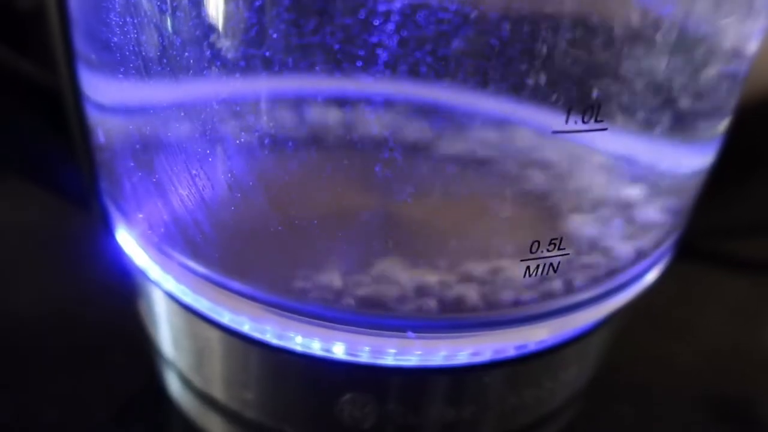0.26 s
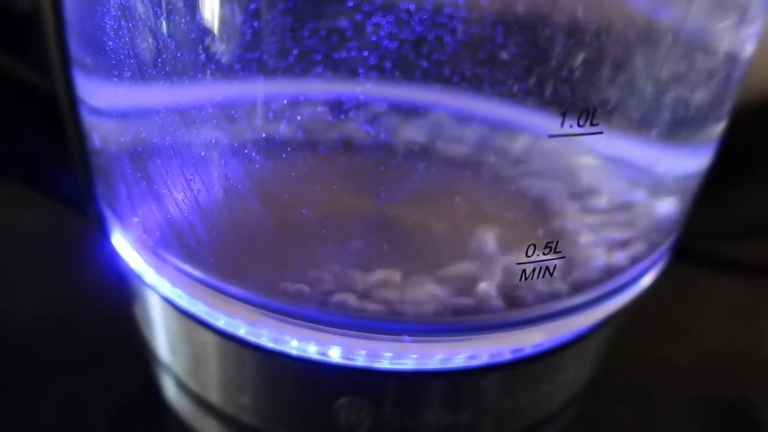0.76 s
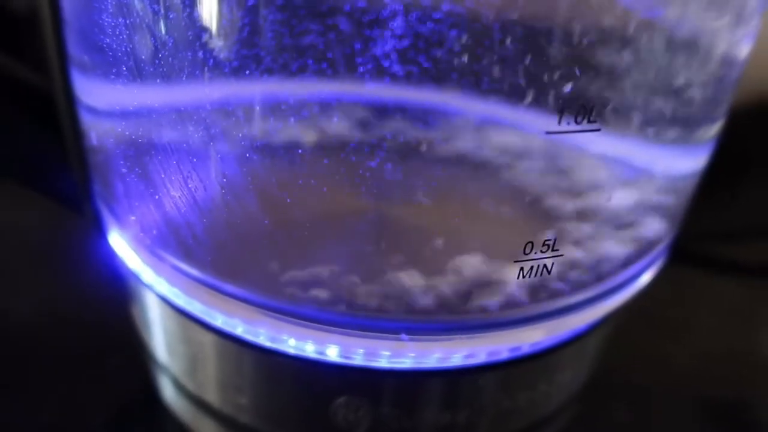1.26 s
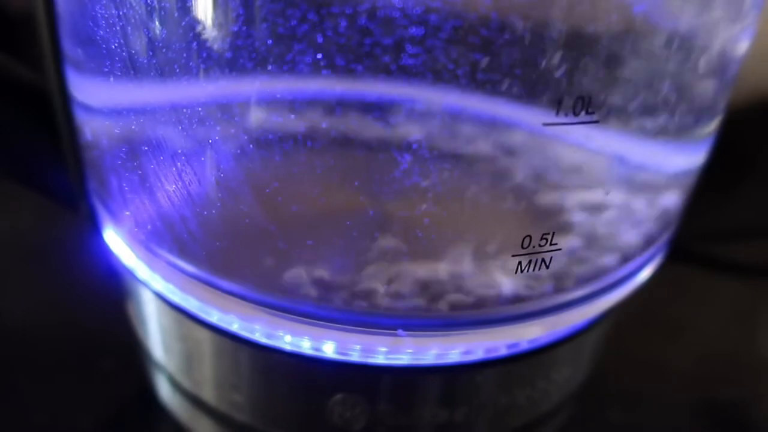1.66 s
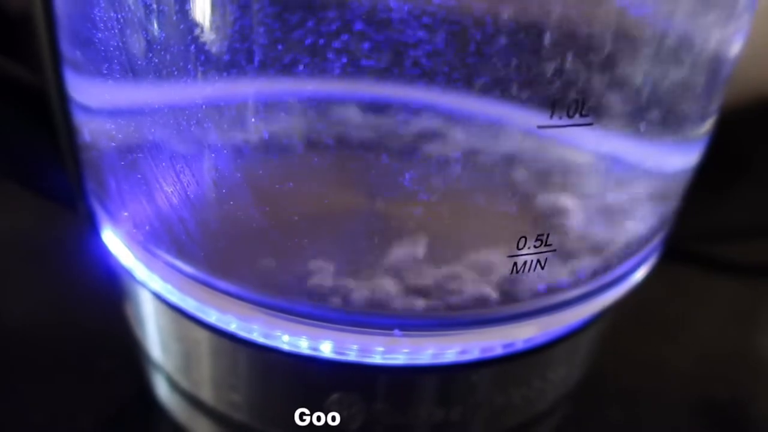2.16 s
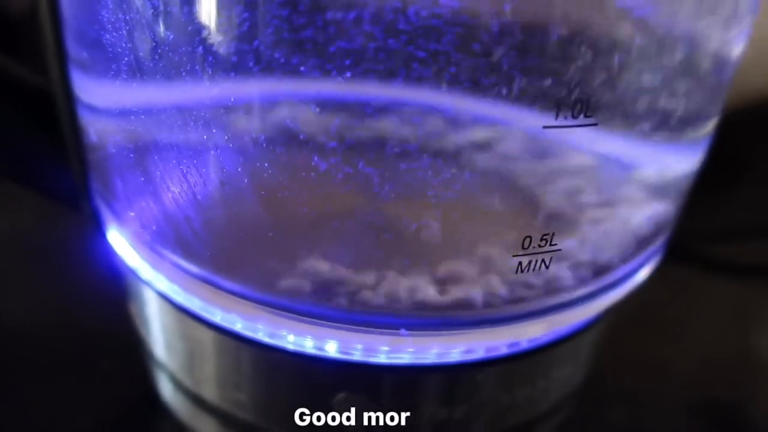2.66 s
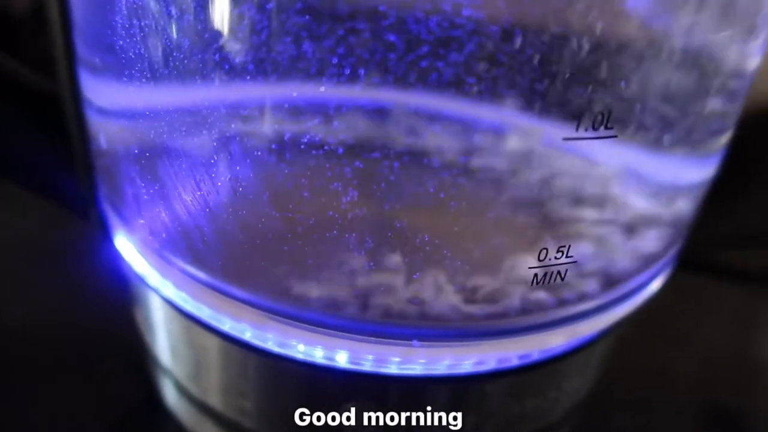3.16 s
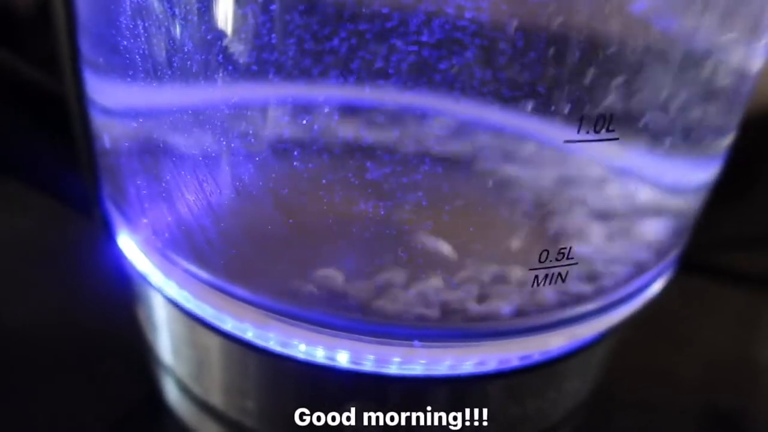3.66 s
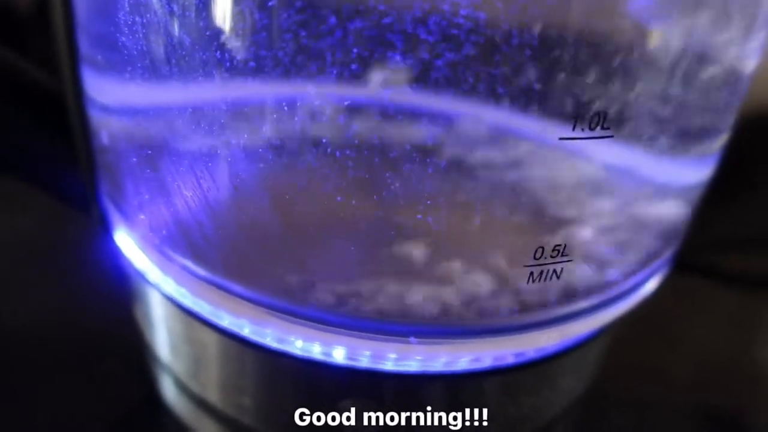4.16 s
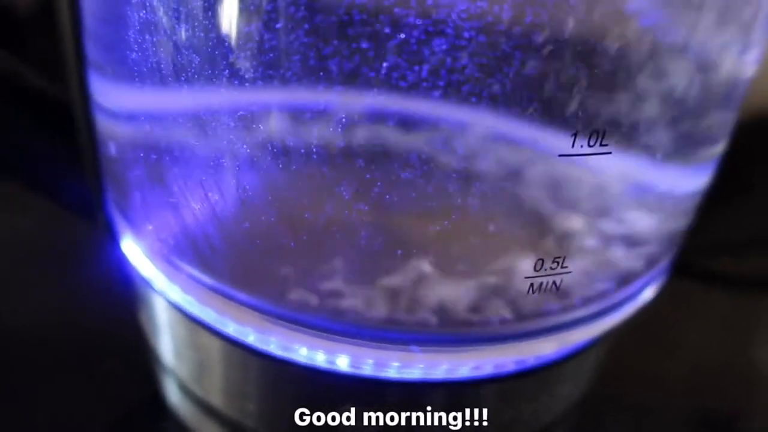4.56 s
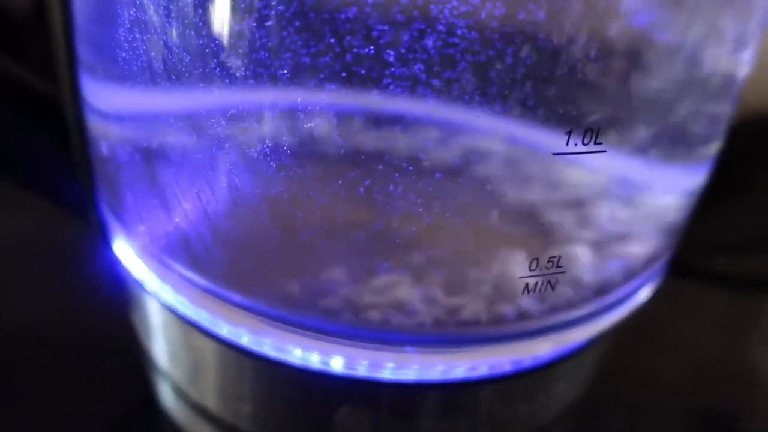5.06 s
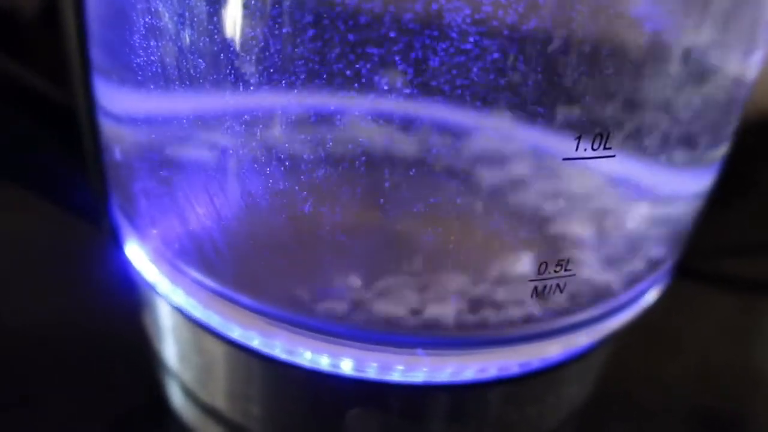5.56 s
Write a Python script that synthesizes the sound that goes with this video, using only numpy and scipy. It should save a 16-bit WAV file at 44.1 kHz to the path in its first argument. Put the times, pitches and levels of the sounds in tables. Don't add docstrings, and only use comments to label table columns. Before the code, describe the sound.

A glass kettle on a kitchen counter heats its water, heard very close in stereo. A deep, steady rumble runs throughout, pulsing irregularly as low booms swell and fade. Dull hollow knocks and small plate ticks from collapsing bubbles come several times a second, beneath a thin, grainy hiss. The bass sits in the centre while the hiss spreads wide. Nothing else happens.

```python
import sys
import numpy as np
from scipy import signal
from scipy.fft import rfft, irfft, next_fast_len
from scipy.io import wavfile
from scipy.ndimage import uniform_filter1d, map_coordinates

SR = 44100
rng = np.random.default_rng(int(sys.argv[2]) if len(sys.argv) > 2 else 0)


def ratio_of_db(decibels):
    return 10 ** (np.asarray(decibels, float) / 20)


def unload_wav(signal):
    wavfile.write(
        sys.argv[1],
        SR,
        np.round(np.clip(np.atleast_2d(signal).T, -1, 1) * 32767).astype(np.int16),
    )


N = 256220

# centre_hz, width_hz, lift_db
BASE_MODES = [(46.1, 8.5, 12), (79, 8.8, 3), (143.5, 24, 3), (323.8, 7.7, 5), (395.5, 35, 2.5),
              (435.4, 13, 6), (503.5, 27, 5)]
# centre_hz, width_hz, lift_db
PLATE_MODES = [(600, 44, 10), (648, 70, 8), (766, 44, 5.5), (856, 78, 9), (877, 24, 8), (962, 45, 7),
               (1020, 270, 4.5), (1277, 140, 6.5), (1550, 94, 7.5), (1638, 106, 6), (1800, 130, 4),
               (2100, 124, 5), (2406, 80, 3.5), (2610, 50, 6), (2690, 90, 2.5), (2900, 330, 3.5),
               (3085, 150, 4.5), (3200, 110, 3), (3287, 60, 7), (3400, 110, 5.5)]
# centre_hz, width_hz, lift_db
GLASS_MODES = [(3885, 90, 3), (4030, 80, 5), (4170, 126, 11), (4285, 81, 9.5), (4570, 100, 4),
               (5660, 59, 9), (6140, 340, 8.5), (6480, 160, 5.5), (7396, 280, 13.5), (7730, 130, 6.5),
               (9560, 230, 7), (10000, 140, 2.5), (12500, 440, 7)]

# frequency_hz, level_db (per Hz)
BASE_COLOUR = [(12, -57), (28, -19.5), (65, -14), (90, -1), (107, -3.5), (125, -1), (190, -6), (300, -4),
               (450, -12), (560, -16.5), (640, -22), (800, -69.5)]
# frequency_hz, level_db (per Hz)
WATER_COLOUR = [(150, -61), (215, -7.5), (240, -2), (256, 3), (278, -2), (305, -12), (420, -69.5)]
# frequency_hz, level_db (per Hz)
PLATE_COLOUR = [(400, -46), (540, -5.5), (640, -1.5), (1000, -4.5), (1420, -10), (2000, -11), (2800, -11.5),
                (3500, -27), (3800, -53.5), (4500, -67.5)]
# frequency_hz, level_db (per Hz)
GLASS_COLOUR = [(2800, -41), (3400, -5), (3700, 0), (4600, -5), (5400, -8), (7050, -8), (8100, -10),
                (9200, -12), (10500, -18), (11500, -19), (12700, -24), (13300, -29), (15200, -33),
                (16000, -90)]
# frequency_hz, level_db
PORT_DIFFERENCE = [(100, -71), (150, -50), (200, -44), (270, -39), (370, -21), (900, -27), (1300, -23),
                   (2200, -26), (2900, -19.5), (3300, -17), (3700, -2.5), (4200, -2), (5200, -2),
                   (7400, -1.5), (9000, 2), (14000, 1)]

# start_s, peak_db, pitch_hz
PLATE_FLECKS = [(0.068, -19, 840), (0.214, -24, 880), (0.481, -23, 872), (0.556, -32, 846),
                (0.753, -26, 880), (0.838, -26, 845), (0.896, -25, 854), (1.038, -35, 990),
                (1.113, -27, 880), (1.312, -26, 978), (1.346, -31, 870), (1.633, -28, 872),
                (1.717, -30, 886), (1.843, -31, 964), (1.936, -25, 880), (1.992, -29, 888),
                (2.107, -37, 880), (2.178, -27, 840), (2.237, -33, 840), (2.299, -34, 800),
                (2.342, -36, 872), (2.481, -35, 964), (2.524, -27, 850), (2.76, -31, 912),
                (3.247, -30, 880), (3.301, -24, 875), (3.339, -27, 893), (3.398, -36, 894),
                (3.523, -25.5, 867), (3.91, -33, 855), (4.105, -26, 840), (4.191, -29, 885),
                (4.269, -29, 854), (4.453, -32, 917), (4.604, -30, 891), (4.792, -32, 850),
                (4.886, -24, 872), (4.939, -37, 880), (5.223, -28, 860), (5.302, -29, 860),
                (5.403, -35, 876), (5.515, -28, 857), (5.615, -26, 868), (5.704, -28, 860),
                (5.766, -42, 900)]
# start_s, peak_db, pitch_hz
PLATE_KNOCKS = [(0.023, -24, 454), (0.271, -25, 358), (0.305, -17, 340), (0.396, -22, 380),
                (0.513, -23, 386), (0.551, -18, 342), (0.628, -16.5, 340), (0.767, -16, 440),
                (0.97, -25, 366), (1.047, -17, 350), (1.149, -21, 366), (1.206, -21, 388),
                (1.319, -22, 452), (1.379, -29, 354), (1.438, -19, 432), (1.498, -18, 398),
                (1.598, -23, 400), (1.644, -19, 436), (1.88, -30, 375), (2.0, -19, 377), (2.044, -18, 386),
                (2.111, -27, 410), (2.25, -18, 415), (2.441, -19, 358), (2.496, -21, 354),
                (2.601, -27, 431), (2.931, -27, 444), (3.088, -18, 347), (3.186, -17, 345),
                (3.445, -17.5, 378), (3.586, -19, 434), (3.701, -24, 348), (3.857, -14, 345),
                (3.915, -16, 346), (4.023, -21, 367), (4.064, -30, 439), (4.095, -27, 536),
                (4.128, -21, 383), (4.265, -18, 398), (4.606, -22.5, 387), (4.721, -21, 350),
                (4.813, -26, 396), (5.4, -24, 342), (5.496, -29, 490), (5.59, -27, 538)]
# start_s, length_s, level_db, pitch_hz
COLUMN_SURGES = [(0.006, 0.034, -26, 247), (0.285, 0.027, -27, 254.2), (0.402, 0.054, -24, 264),
                 (0.465, 0.032, -27, 262), (0.828, 0.026, -26, 269), (0.894, 0.036, -29.5, 272),
                 (0.984, 0.035, -29.5, 257), (1.143, 0.02, -21.5, 253), (1.294, 0.023, -25.5, 250),
                 (1.381, 0.034, -29, 261.6), (1.563, 0.042, -27, 259.7), (1.609, 0.03, -29.5, 230),
                 (1.681, 0.028, -24, 250), (2.101, 0.042, -28.5, 257.1), (2.236, 0.031, -23.5, 268.6),
                 (2.396, 0.027, -27.5, 271), (2.701, 0.045, -26, 258.2), (2.786, 0.031, -23, 253),
                 (2.884, 0.032, -27, 245), (3.194, 0.026, -30, 259), (3.433, 0.044, -25, 260.4),
                 (3.573, 0.026, -28, 258), (3.683, 0.018, -26, 271), (3.855, 0.054, -29, 239),
                 (3.94, 0.034, -26.5, 259.6), (4.048, 0.027, -26.5, 265.3), (4.249, 0.045, -25.5, 255),
                 (5.128, 0.044, -26.5, 263), (5.221, 0.03, -25.5, 264), (5.307, 0.031, -23.5, 256),
                 (5.458, 0.064, -27.5, 244.3), (5.713, 0.052, -27, 243), (5.774, 0.036, -27, 259)]
# start_s, length_s, level_db, pitch_hz
BASE_SURGES = [(0.141, 0.031, -27, 141.4), (0.177, 0.07, -29, 140), (0.271, 0.046, -24, 151),
               (0.419, 0.041, -29, 154.8), (0.462, 0.061, -27, 132), (0.624, 0.031, -37, 146.8),
               (0.728, 0.033, -36, 146.7), (0.784, 0.051, -29, 148), (1.047, 0.061, -32, 154),
               (1.309, 0.027, -29, 134), (1.368, 0.049, -25, 146.8), (1.448, 0.027, -24, 130),
               (1.598, 0.032, -29, 148), (1.728, 0.033, -36, 135), (1.763, 0.032, -29, 136),
               (1.829, 0.037, -24, 150), (1.925, 0.038, -25, 149.4), (2.011, 0.051, -31, 141),
               (2.139, 0.053, -29, 152), (2.4, 0.078, -27, 146), (2.663, 0.033, -30, 154.9),
               (2.755, 0.035, -30, 139), (3.065, 0.035, -27, 136.3), (3.252, 0.041, -24, 144.1),
               (3.342, 0.05, -31, 146), (3.472, 0.038, -29, 133.2), (3.518, 0.041, -28, 163),
               (3.677, 0.047, -32, 140), (3.833, 0.033, -27, 160.5), (3.881, 0.04, -25, 159),
               (3.929, 0.035, -32, 137), (4.002, 0.031, -30, 146), (4.114, 0.035, -28, 140.0),
               (4.15, 0.039, -30, 139), (4.282, 0.049, -30, 137), (4.415, 0.042, -27, 150),
               (4.831, 0.028, -36, 145), (4.992, 0.07, -29, 148), (5.078, 0.051, -30, 145),
               (5.176, 0.097, -23.5, 145), (5.347, 0.045, -24, 150.0), (5.565, 0.073, -26, 144)]
# start_s, length_s, level_db, pitch_hz
COUNTER_SURGES = [(0.042, 0.043, -25, 107), (0.089, 0.029, -34, 96.3), (0.164, 0.065, -21, 110),
                  (0.3, 0.22, -23.5, 103.7), (0.606, 0.17, -22.5, 107), (0.943, 0.097, -20, 111),
                  (1.056, 0.11, -23, 105), (1.266, 0.054, -23.5, 100), (1.604, 0.1, -22.5, 104),
                  (1.749, 0.033, -27, 119), (1.797, 0.072, -24.5, 112.4), (2.02, 0.049, -24, 109.2),
                  (2.083, 0.084, -24, 104.5), (2.17, 0.12, -24, 106), (2.334, 0.031, -26, 104),
                  (2.374, 0.19, -22.5, 104), (2.582, 0.063, -24, 103), (2.703, 0.08, -20.5, 106.5),
                  (2.826, 0.047, -25, 103), (2.873, 0.059, -24, 105.3), (2.957, 0.049, -26, 107.5),
                  (3.073, 0.16, -22, 107.4), (3.31, 0.065, -23, 102.3), (3.428, 0.19, -22, 107.3),
                  (3.627, 0.09, -21, 107), (3.749, 0.077, -21.5, 109), (3.95, 0.12, -19.5, 108),
                  (4.126, 0.14, -23, 106.8), (4.315, 0.17, -21, 103.4), (4.571, 0.075, -21.5, 111.8),
                  (4.678, 0.039, -25, 103.5), (4.719, 0.197, -24, 105), (4.919, 0.076, -23, 114),
                  (5.116, 0.039, -26, 102), (5.176, 0.11, -24, 104.6), (5.319, 0.083, -21, 107.7),
                  (5.415, 0.17, -21, 109.6), (5.653, 0.2, -22, 105.3)]

BASE_DB, COLUMN_DB, PLATE_DB, GLASS_DB = -26, -35, -34, -54
SOFTEN_DB_PER_S, SMALL_BUBBLE_SHARE = 0.2725, 0.95
FLECK_LENGTH_S, FLECK_T60_S = 0.00797, 0.044
COLUMN_ATTACK_S, COLUMN_T60_S = 0.015, 0.14
BASE_ATTACK_S, BASE_T60_S = 0.0198, 0.1
COUNTER_ATTACK_S, COUNTER_T60_S = 0.03535, 0.14
SAG_DB_PER_S, WAVER_RAD, BEAT_DB = 4, 0.22, 1.0


def boiling():
    soften_db = SOFTEN_DB_PER_S * np.arange(N) / SR
    shared = 0.43 * flicker(22) + 0.69 * flicker(45)
    small = ratio_of_db(PLATE_DB) * plate_rattle(shared) + ratio_of_db(GLASS_DB) * glass_fizz(shared)
    base = ratio_of_db(BASE_DB - soften_db) * steel_base(shared)
    column = ratio_of_db(COLUMN_DB) * water_column(shared)
    return base + column + ratio_of_db(-SMALL_BUBBLE_SHARE * soften_db) * small


def steel_base(shared):
    return voice(BASE_COLOUR, BASE_MODES, spread_db=1.5, swarm_db=0.1 * shared,
                 lean=0.0024, wander_db=4.0, ring_apart=0.9, patch_db=0.1)


def water_column(shared):
    return voice(WATER_COLOUR, [], spread_db=3.0, swarm_db=0.25 * shared, lean=0.006, wander_db=9, ring_apart=1)


def plate_rattle(shared):
    swarm_db = 0.76 * shared + 0.5 * flicker(40)
    return voice(PLATE_COLOUR, PLATE_MODES, spread_db=2.0, swarm_db=swarm_db,
                 lean=0.023, wander_db=6.0, ring_apart=0.97, patch_db=0.89)


def glass_fizz(shared):
    swarm_db = 0.67 * shared + 1.0 * flicker(140)
    return voice(GLASS_COLOUR, GLASS_MODES, spread_db=5.0, swarm_db=swarm_db,
                 lean=0.03, wander_db=1.5, ring_apart=0.36, patch_db=0.87)


def voice(colour, modes, spread_db, swarm_db, lean, wander_db, ring_apart, patch_db=0.0):
    def mid_db(hz):
        return along(colour, hz) + lift(modes, hz)

    def side_db(hz):
        return along(colour, hz) + ring_apart * lift(modes, hz) + along(PORT_DIFFERENCE, hz)

    mid = ringing(patchy(collapses(spread_db, swarm_db), patch_db), mid_db)
    side = ringing(patchy(collapses(spread_db, swarm_db), wander_db), side_db)
    left = mid + side - lean * mid
    right = mid - side + lean * mid
    return np.array([left, right]) / np.std(mid)


def collapses(spread_db, swarm_db):
    size = np.minimum(rng.exponential(size=N), 5)
    blow_db = np.minimum(spread_db, 3) * size + swarm_db
    return unit(ratio_of_db(blow_db) * rng.standard_normal(N))


def ringing(x, gain_db):
    m = next_fast_len(N + SR // 2) // 2 * 2
    gain = ratio_of_db(gain_db(np.fft.rfftfreq(m, 1 / SR))) + 1e-6
    cepstrum = irfft(np.log(gain), m)
    cepstrum[1:m // 2] *= 2
    cepstrum[m // 2 + 1:] = 0
    lead = np.concatenate([x[-4096:], x])
    return irfft(rfft(lead, m) * np.exp(rfft(cepstrum)), m)[4096:][:N]


def lift(modes, hz):
    power = 1
    for centre_hz, width_hz, lift_db in modes:
        power = power + (ratio_of_db(lift_db) ** 2 - 1) / (1 + (2 * (hz - centre_hz) / width_hz) ** 2) ** 2
    return 10 * np.log10(power)


def patchy(x, depth_db):
    z = signal.stft(x, nperseg=1024)[2]
    field = uniform_filter1d(rng.standard_normal(z.shape), size=8, axis=0)
    field = uniform_filter1d(field, size=4, axis=1)
    return unit(signal.istft(z * ratio_of_db(depth_db * unit(field)), nperseg=1024)[1][:N])


def flicker(rate):
    w = wobble(rate)
    return w - uniform_filter1d(w, size=SR // 8)


def wobble(rate):
    knots = rng.standard_normal(int(N * rate / SR) + 4)
    return map_coordinates(knots, [np.arange(N) * rate / SR])


def unit(x):
    return x / np.sqrt(np.mean(x ** 2) + 1e-20)


def along(points, hz):
    f, v = np.transpose(points)
    return np.interp(np.log(hz + 1), np.log(f + 1), v)


def single_collapses(rows, trim_db):
    hits = [(s, FLECK_LENGTH_S, db, hz) for s, db, hz in rows]
    return rings(hits, FLECK_LENGTH_S, FLECK_T60_S, trim_db)


def column_surges():
    return rings(COLUMN_SURGES, COLUMN_ATTACK_S, COLUMN_T60_S, trim_db=-1.7)


def base_thrum():
    return rings(BASE_SURGES, BASE_ATTACK_S, BASE_T60_S, trim_db=-4.0)


def counter_boom():
    return rings(COUNTER_SURGES, COUNTER_ATTACK_S, COUNTER_T60_S, trim_db=-1.0)


def rings(surges, attack_s, t60_s, trim_db):
    out = np.zeros(N + 2 * SR)
    waver = WAVER_RAD * wobble(22)
    phases = rng.uniform(0, 2 * np.pi, len(surges))
    for (start_s, length_s, level_db, pitch_hz), phase in zip(surges, phases):
        first = max(round((start_s - attack_s / 2) * SR), 0)
        t = np.arange(min(round((length_s + t60_s) * SR), N - first)) / SR
        shape = surge(t, max(length_s - attack_s, 0), attack_s, t60_s)
        tone = np.sin(2 * np.pi * pitch_hz * t + waver[first:][:len(t)] + phase)
        out[first:][:len(t)] += ratio_of_db(level_db) * shape * tone
    return ratio_of_db(BEAT_DB * wobble(30) + trim_db) * np.sqrt(2) * out[:N]


def surge(t, hold_s, attack_s, t60_s):
    rise = np.sin(np.pi / 2 * np.clip(t / attack_s, 0, 1)) ** 2
    sag_db = SAG_DB_PER_S * np.clip(t - attack_s - hold_s / 2, -hold_s / 2, hold_s / 2)
    decay_db = 60 * np.clip(t - attack_s - hold_s, 0, None) / t60_s
    return rise * ratio_of_db(-sag_db - decay_db)


def scene():
    knocks = single_collapses(PLATE_FLECKS, trim_db=-5.5) + single_collapses(PLATE_KNOCKS, trim_db=-8.0)
    return boiling() + knocks + column_surges() + base_thrum() + counter_boom()


def top_cut(x):
    return signal.sosfilt(signal.butter(12, 15140, fs=SR, output="sos"), x)


def record(dry):
    return top_cut(dry)


dry = scene()
out = record(dry)
unload_wav(out)
```